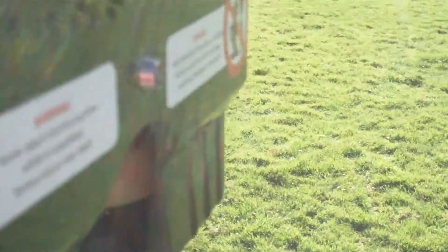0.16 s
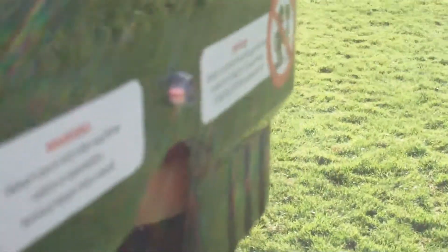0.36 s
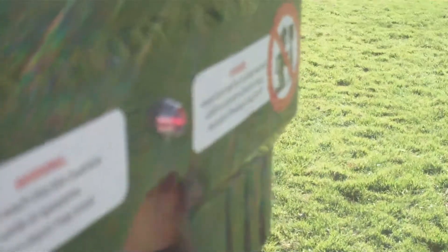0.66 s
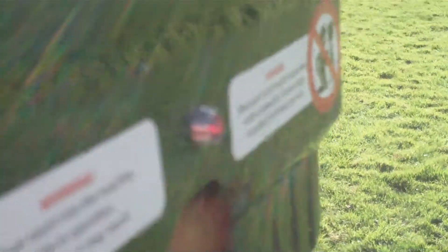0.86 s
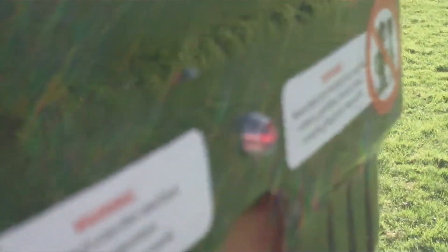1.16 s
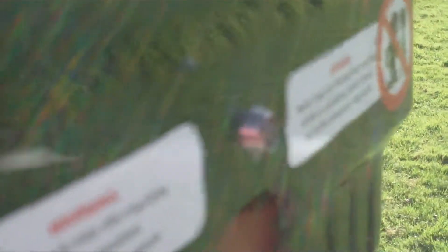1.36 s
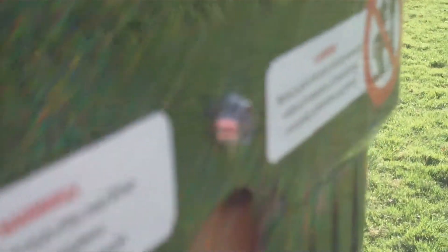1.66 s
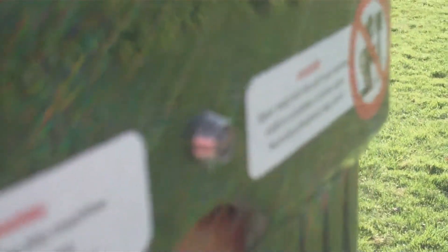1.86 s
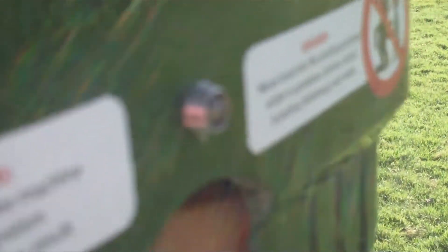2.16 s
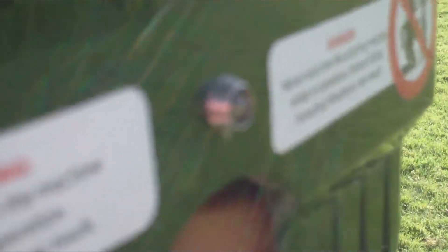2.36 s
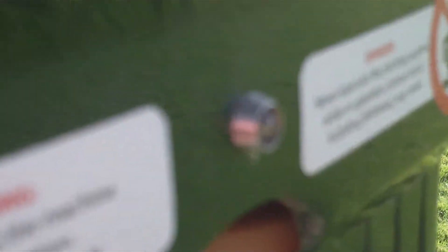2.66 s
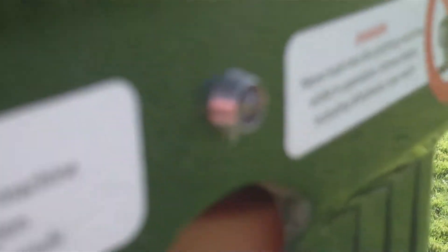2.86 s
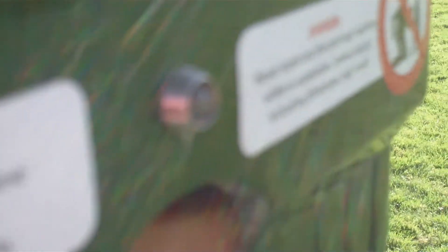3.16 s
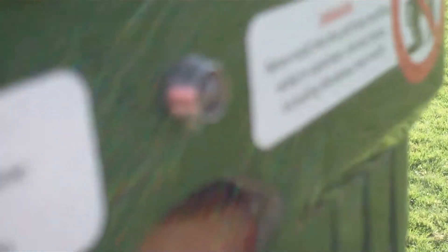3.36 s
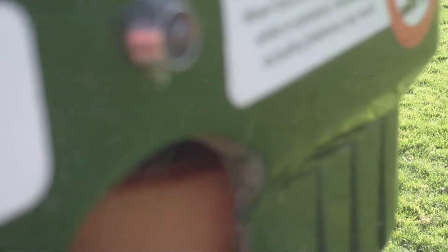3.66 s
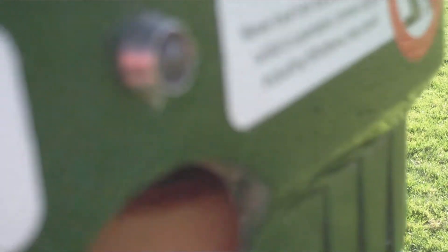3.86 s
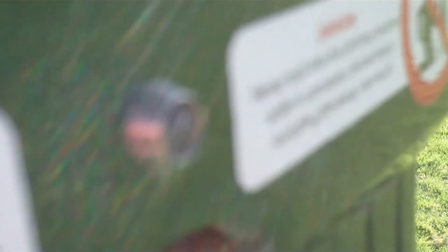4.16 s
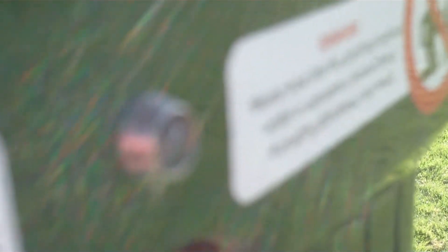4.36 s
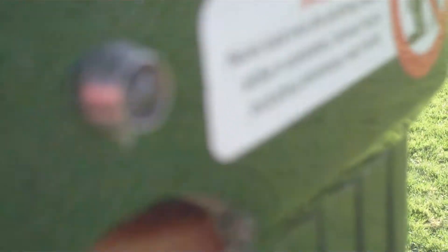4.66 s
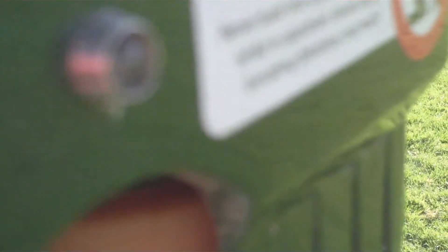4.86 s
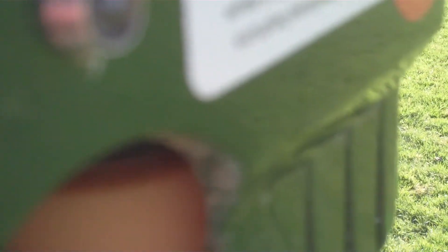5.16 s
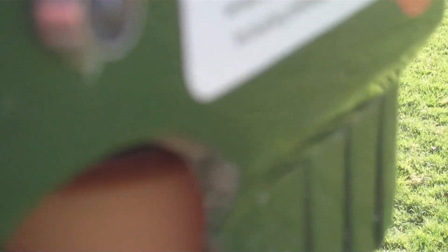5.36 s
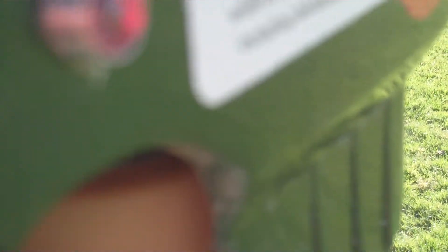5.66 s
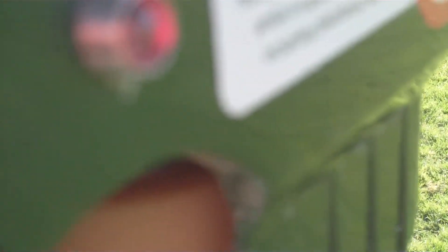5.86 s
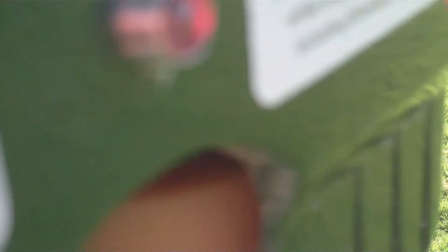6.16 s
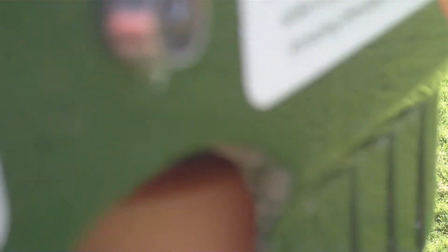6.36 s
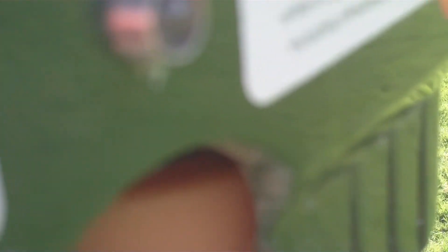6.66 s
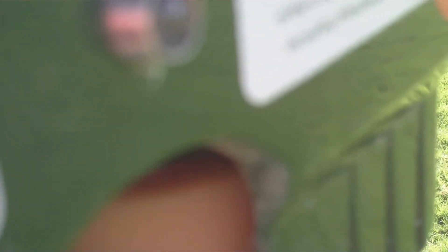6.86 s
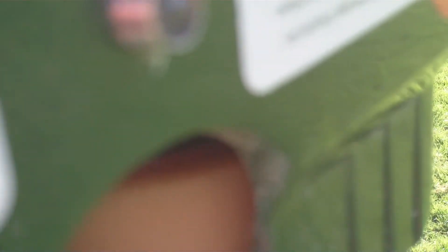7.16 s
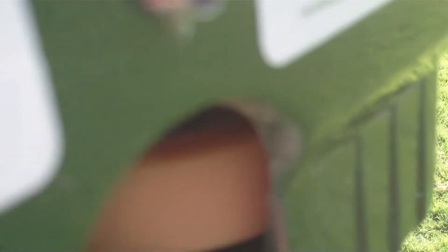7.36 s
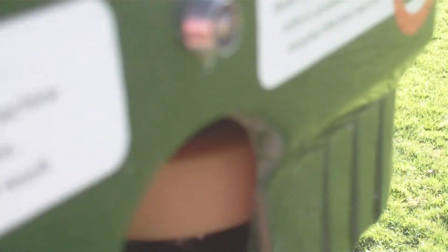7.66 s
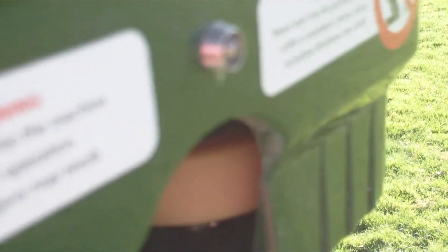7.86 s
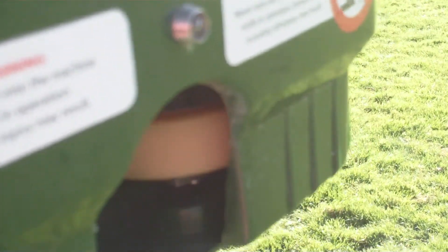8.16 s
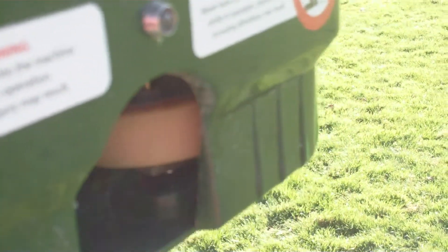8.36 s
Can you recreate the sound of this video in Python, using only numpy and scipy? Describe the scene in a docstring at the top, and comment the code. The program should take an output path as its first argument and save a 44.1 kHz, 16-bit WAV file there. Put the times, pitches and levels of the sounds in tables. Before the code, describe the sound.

Close up in the open air, the motor-driven wheels of a ball launcher drone in a chattering plastic housing while the bearings hiss and faintly squeal. Early on a ball fires with a sharp, overloading thump, and the wheels sag and wind up again. Light ticks and a quick cluster of ball knocks follow, then a second thump and the same dip. One more knock comes at the end, with gusts buffeting the microphone along the way.

```python
"""A ball throwing machine runs on a lawn, close to the microphone: two wheels hum, rattle and squeal
in a plastic housing. Twice a ball is squeezed through with a loud thump; the wheels lose speed
and slowly wind up again. Each thump overloads the recorder, whose gain control ducks and recovers.
Balls knock in the feed, a loose part ticks, and wind buffets the microphone."""
import sys
import numpy as np
from scipy import signal
from scipy.fft import rfft, irfft, next_fast_len
from scipy.io import wavfile
from scipy.ndimage import map_coordinates

SR = 44100
rng = np.random.default_rng(int(sys.argv[2]) if len(sys.argv) > 2 else 0)


def to_wav(sig):
    """Store sig (one row per channel, or 1-D mono) as 16-bit WAV at the path in sys.argv[1].

    Samples outside -1..1 are clipped; the rate is SR.
    """
    pcm = np.clip(np.atleast_2d(sig), -1, 1) * 32767
    pcm = np.round(pcm).astype(np.int16)
    wavfile.write(sys.argv[1], SR, pcm.T)  # frames by channels


N = 376173


# Fader moves as the microphone nears and leaves the machine: time_s, drone_db, rattle_db, treble_db
MACHINE_FADERS = [(0, -20.5, -30, -40), (.42, -20, -28, -32.5), (.72, -20.5, -30, -37.5),
                  (.9, -11.5, -23.5, -29), (1.2, -13.5, -25, -34), (2.05, -12, -21.5, -32),
                  (2.6, -11, -21, -31.5), (2.9, -13, -24, -33), (3.35, -10.5, -22.5, -31),
                  (3.95, -10, -28, -30), (4.75, -11.5, -28, -34.5), (5.15, -13, -27.5, -32),
                  (5.6, -13, -29, -34), (6.45, -13, -29.5, -34.5), (7.6, -14, -27, -32),
                  (8.17, -19, -32.5, -42), (8.45, -18.5, -28, -36)]
def machine():
    """Wheel hum and drone in the housing, a chattering loose part, hissing and squealing bearings."""
    drone_db, rattle_db, treble_db = curves(MACHINE_FADERS)
    hum_db = 4 + .61 * drone_db  # the hum follows only part of the drone's moves
    rough = grinding(0, memory=.6) + grinding(1, memory=.6)
    taps = blows(count=2, scatter_db=1.8, rock_db=5.5, jitter_s=.001)
    buzz = bursts(taps, decay_s=.0045)
    clack = bursts(blows(count=1, scatter_db=3, rock_db=4, jitter_s=.002), decay_s=.0032)
    body = amp(drone_db) * drone(rough, buzz) + amp(rattle_db) * rattle(taps, buzz)
    treble = bearing_hiss(buzz, clack) + bearing_ring() + squeal()
    return body + amp(hum_db) * housing_hum() + amp(treble_db + .72 * wobble(13)) * treble


# Wheels A and B: free_turns_per_s, wind_up_time_constant_s
WHEEL_MOTORS = [(48.99, 2.59), (50.64, 3.23)]
# Throws, the first before the scene opens: start_s, thump_db, a_braked_turns_per_s, b_braked_turns_per_s
BALL_THROWS = [(-3.56, 0, 40.85, 39.04), (1.4884, 0, 41.14, 39.45), (6.537, -1.5, 41.57, 38.82)]
def speed_of(wheel):
    """Turns a second of wheel 0 (A) or 1 (B): each ball brakes it, then it winds up again."""
    free, wind_up_s = WHEEL_MOTORS[wheel]
    t, speed = np.arange(N) / SR, np.zeros(N)
    for s, _, *braked in BALL_THROWS:
        speed = np.where(t < s, speed, free - (free - braked[wheel]) * np.exp((s - t) / wind_up_s))
    return speed


def turns_of(wheel):
    """Turns a wheel has made so far."""
    return np.cumsum(speed_of(wheel)) / SR


def wheel_hum(wheel, orders, waver_db):
    """A wheel shakes the housing at multiples of its turn rate; each wavers in strength and phase."""
    turns = turns_of(wheel)
    return sum(amp(db + waver_db * wobble(7))
               * np.sin(2 * np.pi * (k * turns + rng.random() + .06 * wobble(6))) for k, db in orders)


# Partials of each wheel's hum: turn_rate_multiple, level_db
WHEEL_A_PARTIALS = [(3, -37.5), (5, -42), (6, -34), (7, -34.5), (9, -23), (11, -40), (12, -32.5), (15, -36),
                    (17, -32), (18, -27.5), (19, -37), (20, -35.5)]
WHEEL_B_PARTIALS = [(2, -36.5), (3, -45), (4, -19.5), (5, -31.5), (6, -26.5), (7, -28), (8, -31), (9, -45),
                    (11, -43), (12, -40.5), (16, -37.5), (17, -46), (18, -39), (20, -30)]
# Boom of the hollow housing: pitch_hz, width_hz, gain_db
HOUSING_MODES = [(210, 29, -14), (271, 30, 1), (341.3, 15.7, 10.5), (424.8, 14.6, 7.5), (524.4, 17, 13)]
def housing_hum():
    """Each partial swells as it climbs through a housing resonance; wheels in step make it boom."""
    shake = wheel_hum(0, WHEEL_A_PARTIALS, waver_db=2) + wheel_hum(1, WHEEL_B_PARTIALS, waver_db=1.2)
    housing = lambda f: 1 + sum(amp(db) * resonance(f, hz, width) for hz, width, db in HOUSING_MODES)
    hum = filtered(shake, housing)
    in_step = np.exp(-((speed_of(0) - speed_of(1)) / .045) ** 2)
    boom = amp(-1) * in_step * filtered(hum, lambda f: resonance(f, hz=423, width=26))
    throb = amp(1.1 * wobble(18))
    return throb * (hum + boom)


def grinding(wheel, memory, size=512):
    """Rough running: a pattern of bumps that comes round every turn and changes a little each time."""
    place = turns_of(wheel) * size
    bumps = rng.standard_normal((int(place[-1] / size) + 2, size))
    bumps = signal.lfilter([1], [1, -memory], bumps, axis=0).ravel()
    return unit(np.interp(place, np.arange(len(bumps)), bumps))


# Tone colour of the drone: freq_hz, level_db
DRONE_EQ = [(60, -61), (140, -6.5), (230, -1.5), (330, -1.5), (440, 4.5), (490, -4.5), (555, 1),
            (600, -16.5), (680, -11.5), (760, -3), (1000, -5), (1120, -14), (1700, -18.5), (3000, -42)]
def drone(rough, buzz):
    """The wheels' rough running drones in the housing, pulsing with the loose part's buzz."""
    return (amp(-4.7) + amp(-14) * buzz) * coloured(rough, DRONE_EQ)


# Body of the thump: pitch_hz, level_db, t60_s
THUMP_MODES = [(118, -10.5, 0.082), (273, -3.5, 0.022), (431, -5, 0.065), (603, -1, 0.016),
               (1021, -6.5, 0.02)]
THUMP_GAIN_DB, BALL_CONTACT_S = 21, .0003
def thumps():
    """A ball squeezed out between the wheels gives a short, deep ring and a scuff."""
    out, t = np.zeros(N), np.arange(SR // 4) / SR
    body = sum(amp(db) * damped_tone(t, hz, t60) for hz, db, t60 in THUMP_MODES)
    attack = 1 - np.exp(-t / BALL_CONTACT_S)
    for s, db, *_ in BALL_THROWS[1:]:
        scuff = amp(-12 - 60 * t / .11) * noise(DRONE_EQ)[:len(t)]
        add(out, s, amp(THUMP_GAIN_DB + db) * attack * (body + scuff))
    return out


def blows(count, scatter_db, rock_db, jitter_s):
    """Wheel B strikes a loose part count times a turn; it rocks, so every second or third hit is harder."""
    at = np.flatnonzero(np.diff(np.floor(count * turns_of(1))))
    chance = rng.uniform(-1, 1, (len(at), 2))
    rocking = np.cos(2 * np.pi * (np.arange(len(at)) * 3 / 7 + .5 * wobble(4)[at]))
    strength = amp(scatter_db * (chance[:, 0] + np.tanh(wobble(11)[at])) + rock_db * rocking)
    at = np.clip(at + jitter_s * SR * chance[:, 1], 0, N - 1).astype(int)
    return np.bincount(at, strength, N)


# Plastic ring of the loose part: pitch_hz, width_hz, gain_db
PLASTIC_MODES = [(800, 260, -7), (1030, 200, -6), (1230, 150, -3), (1500, 240, -5), (1750, 280, 0),
                 (2780, 300, -15), (3500, 350, -12)]
# Tone colour of the rattle: freq_hz, level_db
RATTLE_EQ = [(250, -8), (500, -5), (900, 13), (1100, 2), (1230, 5), (1370, -1.5), (1700, 7), (2300, -17.5),
             (2780, -1.5), (3100, -2), (3600, -5.5), (4050, -24), (6000, -6.5), (9000, -48)]
def rattle(taps, buzz):
    """The loose part's taps ring the plastic over a bed of buzzing noise."""
    return amp(-7.5) * ringing(taps, PLASTIC_MODES) + amp(-7) * (1 + buzz) * noise(RATTLE_EQ)


# Steel ring of the loose part: pitch_hz, width_hz, gain_db
STEEL_MODES = [(6760, 190, -22), (7150, 400, 32), (8000, 350, 5), (8800, 200, -23), (15300, 440, -22)]
# Tone colour of the hiss: freq_hz, level_db
HISS_EQ = [(2000, -35), (3400, -3.5), (4150, -28), (5300, -12), (6600, 7), (7000, 0), (7300, 8.5),
           (7900, -2), (8500, 6.5), (8900, -2), (9600, 1), (11900, -22.5), (14600, -1), (15500, -13)]
def bearing_hiss(buzz, clack):
    """The bearings' hiss pulses with the chatter; a clack each turn makes the steel sizzle."""
    sizzle = ringing(clack * rng.standard_normal(N), STEEL_MODES)
    pulsing = amp(-.5) + amp(-12) * buzz + amp(-11) * clack
    return unit(pulsing * noise(HISS_EQ) + amp(-1.5) * sizzle)


# Bearing ring within the treble layer: time_s, level_db
BEARING_FADER = [(0, -10), (.3, -4.5), (.6, -9.5), (1.1, -5.5), (2.8, -2), (3.9, 1.5), (5.2, -2.5),
                 (5.7, -4), (7.6, 0.5), (7.8, -1), (8.2, 1.5)]
def bearing_ring():
    """A dry bearing scrapes twice a turn and rings at one pitch."""
    scrape = bursts(blows(count=2, scatter_db=2.5, rock_db=5.5, jitter_s=.0027), decay_s=.01)
    mode = lambda f: resonance(f, hz=4770, width=120) * resonance(f, hz=4770, width=850)
    return amp(curves(BEARING_FADER)[0]) * unit(filtered(scrape * rng.standard_normal(N), mode))


# The squeal running free: pitch_hz, harmonic2_db, harmonic3_db, harmonic4_db
SQUEAL_VOICE = (906, 1, -4.5, 0)
# The squeal catches and sags: start_s, length_s, pitch_hz, harmonic2_db, harmonic3_db, harmonic4_db
SQUEAL_SAGS = [(.05, .6, 812, -5, -11, -6), (1.5, .55, 880.4, -14, -16, 3), (3.2, 0.91, 826, -2, -9, -2),
               (5.169, .52, 804, 7, -8, -16), (8.27, .3, 850, 1, 4, -1)]
# Squeal within the treble layer: time_s, level_db
SQUEAL_FADER = [(0, -1), (1, -6), (3.2, -4), (4.3, -5), (5.15, -4.5), (6.05, -3), (6.5, -21), (8, -8),
                (8.5, -7)]
def squeal():
    """A thin bearing tone heard by its overtones: raspy running free, lower and clearer in each sag."""
    free = np.array(SQUEAL_VOICE)[:, None]
    shift = sum(swell(s, length, attack_s=.24, release_s=.34) * (np.array(sag)[:, None] - free)
                for s, length, *sag in SQUEAL_SAGS)
    hz, *overtones_db = free + shift
    rasp = np.interp(hz, [830, 910], [.007, .021])
    phase = 2 * np.pi * np.cumsum(hz * (1 + .006 * wobble(12) + rasp * wobble(300))) / SR
    tone = sum(amp(db + 2.8 * wobble(25)) * np.sin(k * phase) for k, db in enumerate(overtones_db, 2))
    return amp(curves(SQUEAL_FADER)[0] + 1.4 * wobble(7)) * tone


# Ball hits in the feed: start_s, level_db, pitch_hz, t60_s, relative_crack_db
FEED_KNOCKS = [(3.4538, -9, 1930, 0.016, -5), (3.463, -6, 1830, 0.009, 1.5), (3.514, 0, 1144, 0.017, -18),
               (8.463, -19.5, 1840, 0.031, 2), (8.5, -3.5, 730, 0.11, -35)]
def knocks():
    """Balls knock in the feed, each with one ringing pitch and a bright crack."""
    out, t = np.zeros(N), np.arange(SR // 4) / SR
    for s, db, hz, t60, crack_db in FEED_KNOCKS:
        crack = amp(crack_db - 60 * t / .017) * (noise(RATTLE_EQ) + .49 * noise(HISS_EQ))[:len(t)]
        add(out, s, amp(db) * (damped_tone(t, hz, t60) + crack))
    return out


# Accents on top of the rattle: start_s, force_db
HARD_TICKS = [(1.4394, -10), (1.9624, -14), (2.2283, -10), (2.3356, -16), (2.6314, -8), (2.759, -9),
              (2.7815, -5), (3.2965, -7), (7.0996, -13), (7.316, -17)]
def ticks():
    """Now and then the loose part strikes harder: a short burst of rattle and ringing steel."""
    force, t = np.zeros(N), np.arange(SR // 20) / SR
    for s, db in HARD_TICKS:
        add(force, s, amp(db - 60 * t / .022))
    return amp(-9) * force * (noise(RATTLE_EQ) + ringing(rng.standard_normal(N), STEEL_MODES))


# Gusts on the microphone: start_s, length_s, level_db
WIND_GUSTS = [(-.2, 0.77, -14), (1.03, .4, -20.5), (2.15, 0.48, -30), (4.599, 1.1, -27.5),
              (5.65, 0.92, -26), (6.607, 1.7, -18.5), (7.999, 0.35, -13.5)]
# Tone colours of strong and of light air: freq_hz, level_db
BUFFET_EQ = [(20, -38), (60, -4), (135, -0.5), (200, -7), (320, -9.5), (500, -18), (1200, -54), (4000, -84)]
RUMBLE_EQ = [(15, -28), (30, -9.5), (55, -3), (100, -1.5), (170, -16), (600, -79)]
CALM_DB = -33
def wind():
    """Light air only rumbles on the microphone; stronger gusts buffet it higher up."""
    gust_power = sum((amp(db) * swell(s, length, attack_s=.067, release_s=.35)) ** 2
                     for s, length, db in WIND_GUSTS)
    level_db = 10 * np.log10(amp(CALM_DB) ** 2 + gust_power)
    gusty = np.interp(level_db, [-32, -16], [.3, .95])
    air = gusty * noise(BUFFET_EQ) + np.sqrt(1 - gusty ** 2) * noise(RUMBLE_EQ)
    flutter = amp(1.7 * wobble(26) + .27 * wobble(1.6))
    return amp(level_db) * unit(flutter * air)


def amp(db):
    """Decibels to gain."""
    return 10 ** (np.asarray(db) / 20)


def unit(x):
    """Scaled to rms 1."""
    return x / np.sqrt(np.mean(x ** 2) + 1e-20)


def curves(rows):
    """One value per sample for each column after the time."""
    s, *cols = np.transpose(rows)
    return [np.interp(np.arange(N) / SR, s, c) for c in cols]


def wobble(rate):
    """A smooth random curve, rate knots a second."""
    return map_coordinates(rng.standard_normal(int(N * rate / SR) + 4), [np.arange(N) * rate / SR])


def swell(start, length, attack_s, release_s):
    """Rises smoothly from 0 to 1, holds until start + length, then falls back."""
    t = np.arange(N) / SR
    ease = lambda u: np.sin(np.pi / 2 * np.clip(u, 0, 1)) ** 2
    return ease((t - start) / attack_s) * (1 - ease((t - start - length) / release_s))


def lag(x, seconds):
    """Follows x with an exponential delay."""
    keep = np.exp(-1 / (seconds * SR))
    return signal.lfilter([1 - keep], [1, -keep], x)


def bursts(pulses, decay_s):
    """Each blow as a quick rise and fall; rms 1."""
    return unit(lag(lag(pulses, decay_s), .00035))


def filtered(x, response):
    """x times a response of frequency."""
    m = next_fast_len(N + SR // 2)
    return irfft(rfft(x, m) * response(np.fft.rfftfreq(m, 1 / SR)), m)[:N]


def resonance(f, hz, width):
    """Response of one mode, 1 at its centre."""
    return 1j * f * width / (hz * hz - f * f + 1j * f * width)


def ringing(x, modes):
    """x through modes of alternating polarity; rms 1."""
    return unit(filtered(x, lambda f: sum((-1) ** k * amp(db) * resonance(f, hz, width)
                                          for k, (hz, width, db) in enumerate(modes))))


def damped_tone(t, hz, t60):
    """One struck mode, dying by 60 dB in t60 seconds."""
    return amp(-60 * t / t60) * np.sin(2 * np.pi * hz * t)


def coloured(x, eq):
    """x through an EQ curve; rms 1."""
    hz, db = np.transpose(eq)
    return unit(filtered(x, lambda f: amp(np.interp(np.log(f + 1), np.log(hz), db))))


def noise(eq):
    """Coloured noise of rms 1."""
    return coloured(rng.standard_normal(N), eq)


def add(track, s, sound):
    """Mixes a sound into the track at time s."""
    part = track[round(s * SR):][:len(sound)]
    part += sound[:len(part)]


def scene():
    """Everything is close and dry in the open air."""
    return (machine() + thumps() + knocks() + ticks() + wind())[None]


def gain_control(x, threshold_db, attack_s, release_db_per_s):
    """Peaks over the threshold pull the gain down; it climbs back at a steady rate."""
    over_db = np.maximum(20 * np.log10(np.abs(x) + 1e-9) - threshold_db, 0)
    climb_db = release_db_per_s * np.arange(N) / SR
    duck_db = np.maximum.accumulate(over_db + climb_db) - climb_db
    return x * amp(-lag(duck_db, attack_s))


TOP_HZ = 15500
def record(dry):
    """Gain control, hard clipping at full scale and the band limit."""
    ducked = gain_control(dry[0], threshold_db=0, attack_s=.0105, release_db_per_s=53)
    return filtered(np.clip(ducked, -1, 1), lambda f: f < TOP_HZ)[None]


dry = scene()
out = record(dry)
to_wav(out)
```